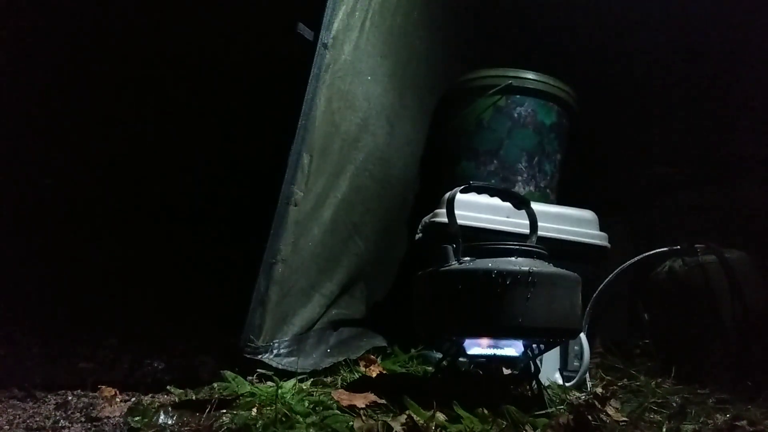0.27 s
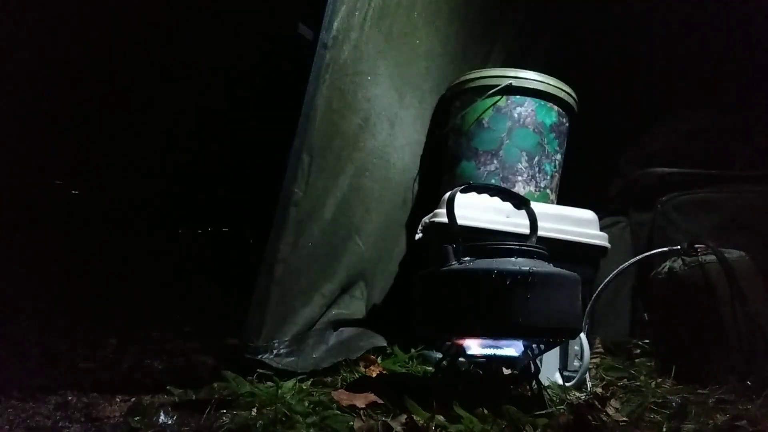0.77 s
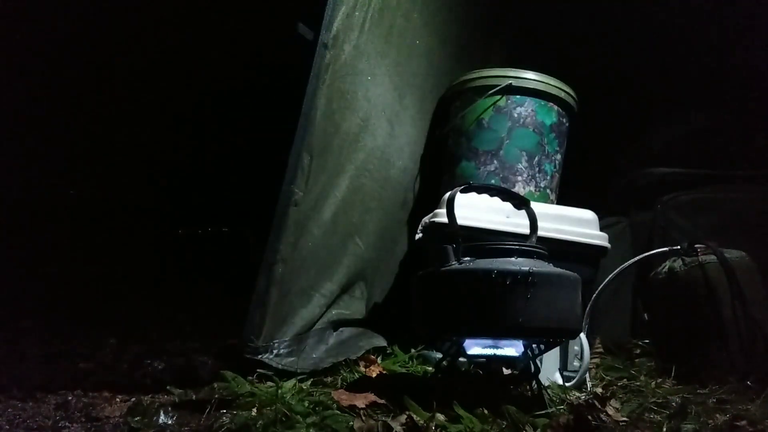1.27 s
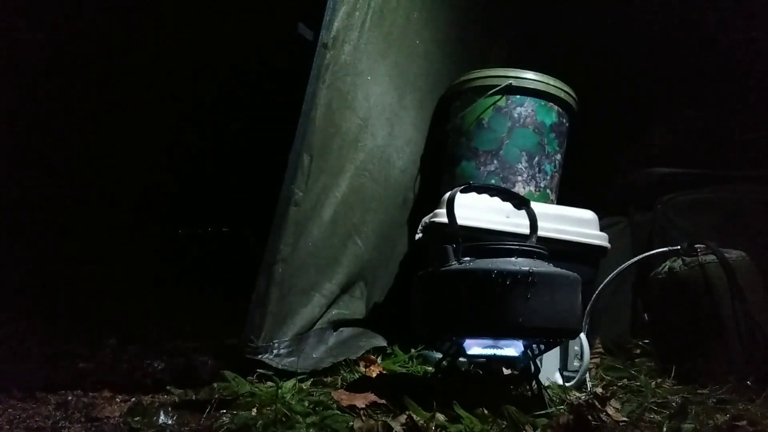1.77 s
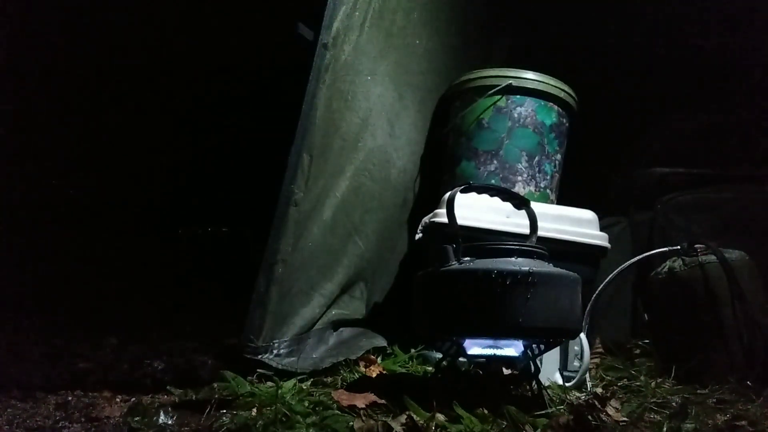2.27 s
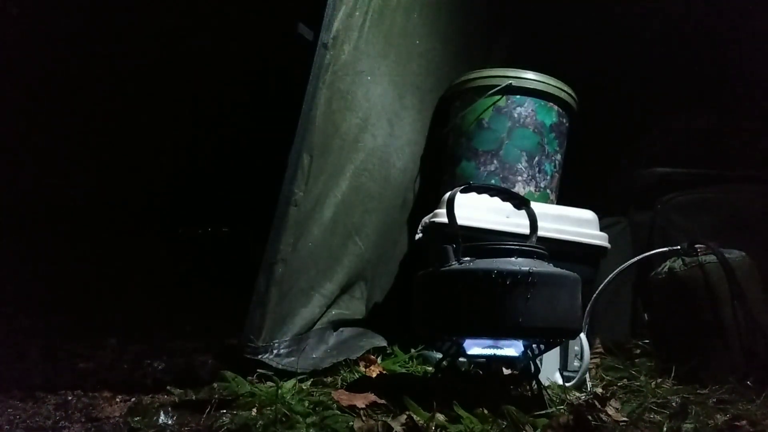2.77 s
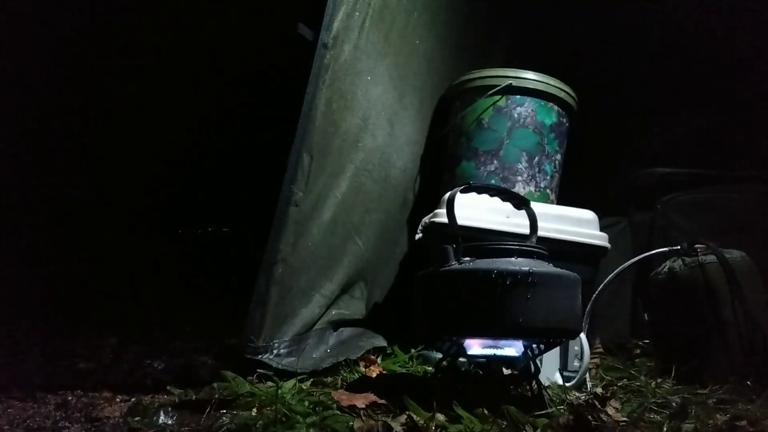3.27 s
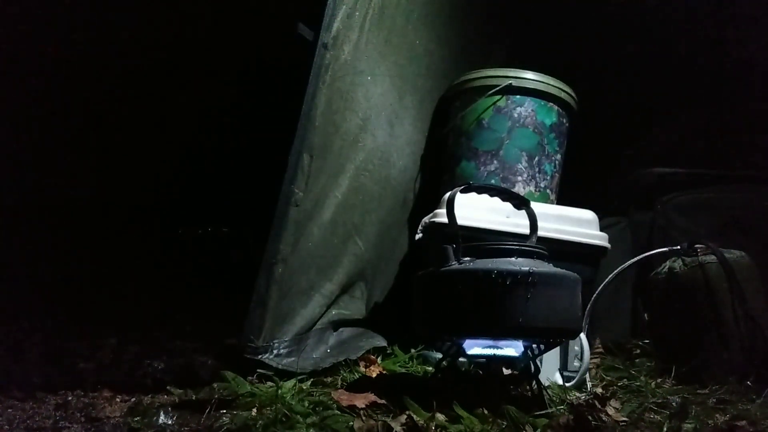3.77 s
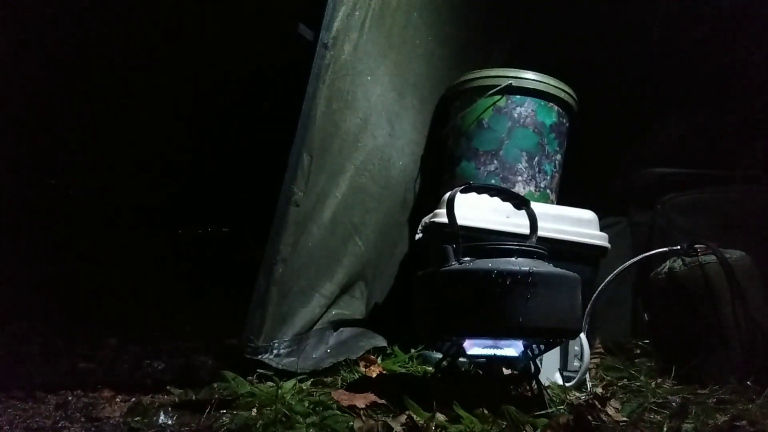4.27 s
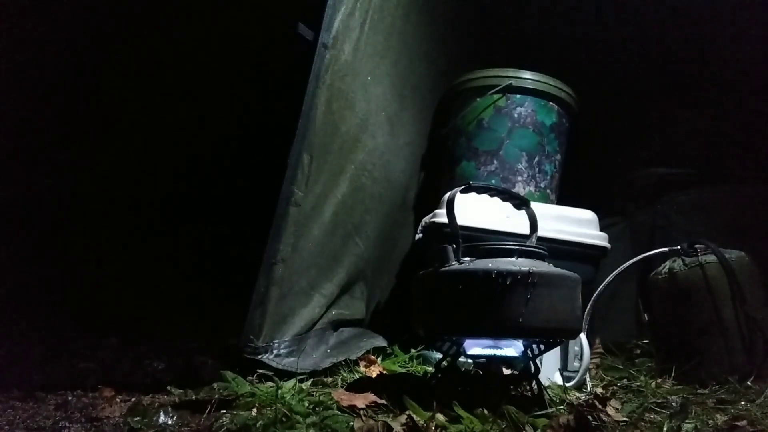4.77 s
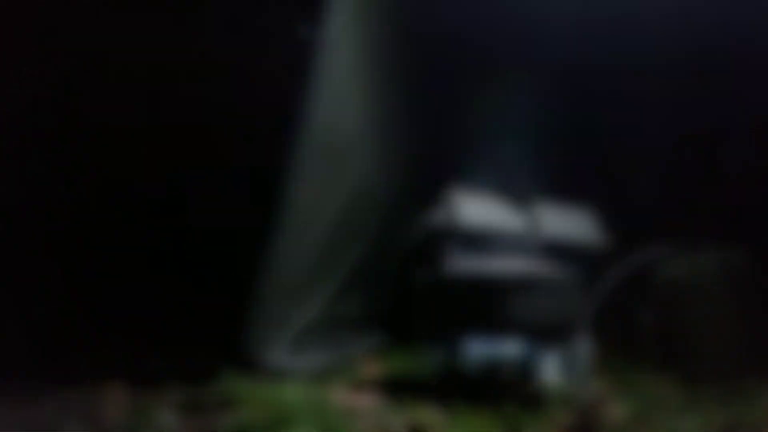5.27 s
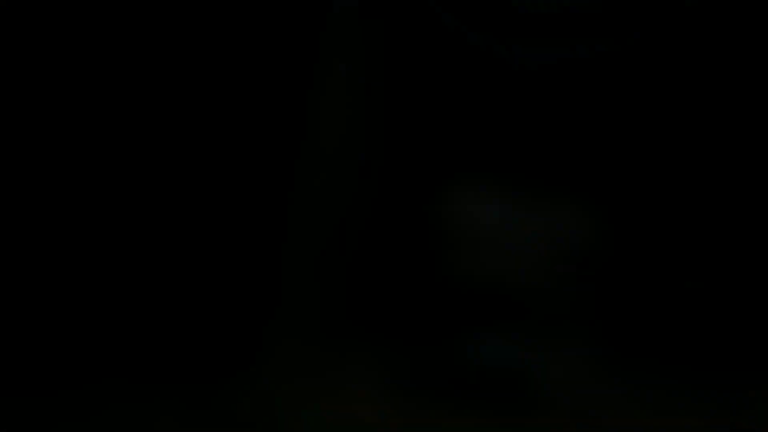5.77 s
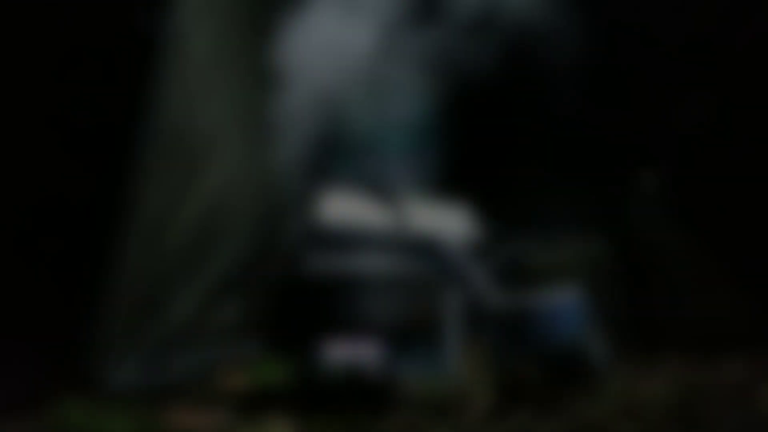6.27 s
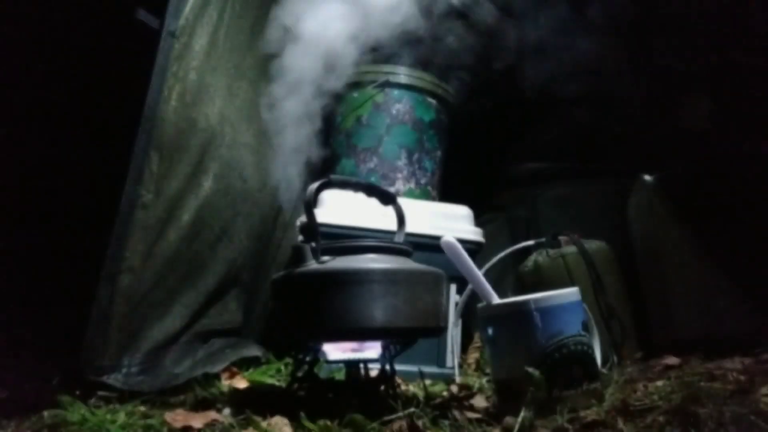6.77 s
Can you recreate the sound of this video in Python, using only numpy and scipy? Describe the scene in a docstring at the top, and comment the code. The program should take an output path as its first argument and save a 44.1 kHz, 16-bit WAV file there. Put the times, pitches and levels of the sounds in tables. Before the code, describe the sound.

Close, outdoors at night: a gas stove gives a low, fluttering roar with a thin jet hiss and faintly singing kettle water. Heavy drops thud on a taut tarp and lighter ones tick and spatter. One drop cracks and sizzles on the burner. A faint high electronic whine creeps in, then an abrupt cut leaves lumpy boiling rumble.

```python
"""A gas camping stove roars under a kettle on a wet night, beside a tarp shelter.
Flame and boil are coloured noise and clicks; the jet hiss, singing water and kettle wall are driven resonances.
Heavy drops thud as ringing cloth modes, light ones tick, ping and spatter, and one drop spits on the burner.
A thin electronic whine sets in as uneven ticks; near the end the scene cuts to the kettle at the boil:
singing, jet hiss and light drops are gone, the water rumbles over the flame and the whine is steady tones."""
import sys
import numpy as np
from scipy import signal
from scipy.fft import rfft, irfft, next_fast_len
from scipy.io import wavfile

SR = 44100
rng = np.random.default_rng(int(sys.argv[2]) if len(sys.argv) > 2 else 0)


def unload_audio(sound):
    """Save the sound as a 16-bit wav file, at the path given as the first command line argument."""
    columns = np.transpose(np.atleast_2d(sound))
    # keep every value between -1 and 1, then stretch to whole-number steps
    steps = np.round(np.clip(columns, -1, 1) * 32767)
    wavfile.write(sys.argv[1], SR, steps.astype(np.int16))


N = 310023
TIME = np.arange(N) / SR
FFT_SIZE = next_fast_len(N + 4096)
BINS_HZ = np.fft.rfftfreq(FFT_SIZE, 1 / SR)
CUT_S = 5.922  # cut from the simmering scene to the boiling one

# Colour of the flame's roar. Each row: frequency in Hz, relative level in dB per Hz.
FLAME_COLOUR = [(32, -64.5), (55, -38), (67, -25), (84, -16), (146, -7.5), (183, -7.5), (259, -1.5),
                (390, -2), (439, 1.5), (522, -1.5), (565, -8.5), (756, -6.5), (851, -15), (934, -11),
                (1300, -34.5), (1690, -62), (2860, -120)]
# Colour of flame plus boiling water. Each row: frequency in Hz, relative level in dB per Hz.
BOIL_COLOUR = [(32, -78), (55, -48), (74, -21), (156, -10), (257, -2), (313, -10), (376, -2), (417, -6),
               (521, -5.5), (563, -16.5), (676, -10), (890, -11.5), (988, -16.5), (1170, -42),
               (1250, -44.5), (1620, -60), (2750, -120)]
# How alike the roar is at the two ears. Each row: frequency in Hz, likeness from -1 to 1.
ROAR_LIKENESS = [(45, -1), (90, 0), (150, 0.6), (250, 1), (400, 0.99), (1200, 0.9)]
# Stereo lean of the flame. Each row: frequency in Hz, left over right in dB.
FLAME_PAN = [(60, 2.8), (150, 6.5), (450, 6.25), (750, 5.2), (1200, 0.92)]
# Stereo lean of the boil. Each row: frequency in Hz, left over right in dB.
BOIL_PAN = [(60, 1.0), (150, 3.9), (300, 1.0), (500, 3.4), (1200, 1.9)]
# Slow swing of the roar, heard in part and about its mean. Each row: time in seconds, level in dB.
ROAR_SWING = [(0.0, -33.5), (0.27, -35), (0.62, -32), (1.04, -37.5), (1.19, -33), (1.49, -32.5),
              (1.74, -33.5), (3.56, -34.5), (3.99, -33.5), (4.36, -35), (5.07, -32.5), (5.56, -32.5),
              (5.85, -33.5), (7.03, -37)]
# The roar's flickering top. Each row: frequency in Hz, share that flickers (0 to 1).
ROAR_FRINGE = [(950, 0.094), (1120, 0.99)]
# Roar and kettle dull briefly. Each row: start in seconds, length in seconds, change in dB.
DULL_SPELLS = [(1.67, 0.05, -6), (2.66, 0.12, -2), (3.38, 0.059, -6), (5.40, 0.17, -13.5)]
# The flame's low boom. Each row: frequency in Hz, width in Hz, relative level in dB rms.
BOOM_MODE = [(147.5, 18, -1)]
# The boom swells. Each row: start in seconds, length in seconds, rise in dB.
BOOM_SWELLS = [(3.66, 0.52, 14.8), (5.19, 0.21, 13)]
FLAME_DB, BOIL_DB = -31.5, -31.5  # rms, before the shaping in burner()
ROAR_FOLLOWS = 0.68  # share of the slow swing that is heard
EDGE_DB = -2  # bright upper edge: 1.5 times this before the cut, half of it after
EDGE_FLUTTER_DB, BASS_WOBBLE_DB, FRINGE_FLICKER_DB = 2, 2.5, 1.5
DULL_RAMP_S, BOOM_RAMP_S = 0.043, 0.08
BOOM_DB = -55.5  # gain between the swells

# Resonances of the gas jet. Each row: frequency in Hz, width in Hz, level in dB rms.
JET_MODES = [(4050, 170, -70.5), (4413, 150, -64.5), (4490, 80, -67.5)]

# Modes of the kettle's wall. Each row: frequency in Hz, width in Hz, level in dB rms before it wavers.
KETTLE_MODES = [(1508, 78, -76.5), (1880, 280, -74), (2730, 510, -82), (3700, 140, -78), (5520, 210, -87)]
WALL_FOLLOWS = 0.39  # share of the simmer's swing that the wall follows

# Colour of the simmer. Each row: frequency in Hz, relative level in dB per Hz.
SIMMER_COLOUR = [(1200, 7), (1700, 7), (2200, -2.5), (2800, 5.5), (3800, 9.5), (5000, -8), (5600, -11.5),
                 (7000, -15.5), (8500, -5)]
# Single swarms merge into an even rush as the water heats. Each row: time in seconds, swell depth in dB.
SWELL_DEPTH = [(2.0, 14), (5.2, 7)]
# The simmer comes in surges. Each row: start in seconds, length in seconds, rise in dB.
SURGES = [(1.28, 0.36, 6.5), (2.1, 0.14, 3.5), (3.92, 0.43, 5), (5.22, 0.32, 8.5), (5.66, 0.3, 8)]
SIMMER_DB, HEATING_DB_PER_S, SURGE_RAMP_S = -71, 0.13, 0.071

# Background hiss of the microphones. Each row: frequency in Hz, relative level in dB per Hz.
HISS_COLOUR = [(100, 13.5), (1300, 7.5), (2000, 8.5), (3200, 4.5), (5300, 2.5), (6500, 2), (10000, -0.5),
               (15000, -4)]

# Bubble swarms that sing out. Each row: centre in seconds, length in seconds, pitch in Hz, peak in dB rms.
LOUD_SWARMS = [(0.287, 0.049, 3550, -63), (1.234, 0.031, 2960, -60), (1.962, 0.029, 3030, -59),
               (2.253, 0.045, 1640, -63), (4.325, 0.19, 1520, -61), (4.95, 0.38, 1430, -65.5),
               (5.85, 0.064, 3120, -60)]
# A large bubble thumps at the boil. Each row: time in seconds, level of the push in dB.
BOIL_THUMP = [(6.476, -15.5)]
SWARM_WIDTH = 0.18  # share of the pitch

# Heavy drops on the tarp. Each row: time in seconds, thud in dB, tautness of the spot as tilt in dB per octave,
# slap in dB, spray in dB, seconds until the cloth snaps back, that second thud against the first in dB.
HEAVY_DROPS = [(0.5014, -3, 6, -34, -52, 0.0058, -11), (0.9377, 1.5, 1.5, -35.5, -50.5, 0.015, -11),
               (1.4943, -1, -3.5, -35, -58, 0.009, -9), (2.0225, -4.5, 2, -37, -53, 0.0045, -18),
               (2.4885, -11.5, -8, -48.5, -59, 0.00413, -6), (3.5655, -9, 0, -39, -62, 0.0076, -5),
               (3.814, -5.5, -11, -36.5, -54, 0.00566, -0.5)]
# Modes of the taut cloth. Each row: frequency in Hz, relative level in dB, 60 dB decay in seconds.
TARP_MODES = [(231, -33, 0.07), (363, -20.5, 0.057), (465, -14.5, 0.051), (567, -16, 0.024),
              (727, -17.5, 0.021), (860, -24, 0.012), (1520, -30, 0.0074), (1750, -33, 0.0038)]
# Colour of a drop's slap. Each row: frequency in Hz, relative level in dB per Hz.
SLAP_COLOUR = [(400, 0), (900, 9), (1650, 7.5), (2300, 10.5), (3000, 4), (4200, -2.5), (5200, -19),
               (9000, -36.5)]
# Colour of a drop's spray. Each row: frequency in Hz, relative level in dB per Hz.
SPRAY_COLOUR = [(2500, -18), (4400, 1), (5500, 6), (6800, -5.5), (8200, -5.5), (9500, -11), (12000, -16),
                (15000, -19)]
REBOUND_SPLASH_DB = -13  # the snap back splashes less than the drop

# Light drops on wet things nearby. Each row: time in seconds, slap in dB, spray in dB,
# pitch of the ping in Hz, ping in dB.
LIGHT_DROPS = [(0.7418, -38, -54.5, 3460, -47), (1.4098, -36, -71, 3000, -53),
               (1.4285, -35, -69, 3120, -55.5), (1.4642, -35.5, -61, 3000, -56.5),
               (1.804, -50, -50.5, 7700, -56), (2.465, -53.5, -52.5, 5700, -61),
               (2.491, -57, -64, 9800, -58.5), (2.574, -65, -70, 10100, -65), (2.9243, -59, -51, 5600, -59),
               (5.2251, -42.5, -61, 1500, -47), (5.831, -43, -51.5, 3600, -48.5)]
PING_WIDTH, PING_T60_S = 0.51, 0.061  # share of the pitch; seconds
DRIPS_PER_S, DRIP_SLAP_DB, DRIP_SPRAY_DB = 1.4, -66.5, -64

# Whine stuttering before the cut. Each row: frequency in Hz, width in Hz, level in dB rms.
STUTTER_TONES = [(13900, 840, -76), (14940, 210, -79), (15250, 400, -87)]
# Whine steady after the cut. Each row: frequency in Hz, width in Hz, level in dB rms.
STEADY_TONES = [(14500, 15, -90), (14622, 15, -79.5), (15125, 15, -85), (15255, 15, -75), (15375, 15, -78)]
WHINE_START_S, TICKS_PER_S = 3.63, 500
OFFBEAT_DB, TICK_SPREAD_DB, WHINE_FLUTTER_DB = -5, 3, 0.5

# A drop spits on the hot burner. Each row: time in seconds, level in dB.
SPIT = [(3.8936, -34)]
# Modes of the burner head. Each row: frequency in Hz, relative level in dB, 60 dB decay in seconds.
BURNER_MODES = [(2020, -6, 0.011), (2810, 9.5, 0.02), (3580, 1, 0.0084), (5430, 8, 0.02), (8150, -1, 0.011),
                (11900, -10, 0.0085)]
# Colour of the sizzle after the spit. Each row: frequency in Hz, relative level in dB per Hz.
SIZZLE_COLOUR = [(2000, -12), (3200, 4), (5600, -3), (6800, 0), (8400, 2.5), (9500, -20), (12300, -8),
                 (14000, -23)]
SIZZLE_DB, SIZZLE_T60_S = -17, 0.35  # level against the hit

# Phase between the two microphone ports. Each row: frequency in Hz, radians by which left leads.
PORT_PHASE = [(0, 0.5), (200, 0.16), (1550, 0), (1950, -2.5), (2300, -0.5), (2600, 1.5), (3250, 0.5),
              (4400, 3), (5500, 6), (15500, 34.5)]
# Narrow dip near 2.3 kHz in the part common to both ears. Each row: frequency in Hz, gain of that part in dB.
COMMON_DIP = [(1950, 0), (2200, -23), (2400, -15.5), (2650, 0)]
CUTOFF_HZ = 15550


def from_db(db):
    """Decibels to gain."""
    return 10 ** (np.asarray(db) / 20)


def rms_one(x):
    """Scale to unit rms."""
    return x / np.sqrt(np.mean(x ** 2) + 1e-20)


def noise_pair():
    """Two unrelated white noises."""
    return rng.standard_normal((2, N))


def lean(left_db, right_db):
    """Left and right gains."""
    return from_db([[left_db], [right_db]])


def over_hz(points):
    """A (Hz, value) table at every frequency bin, joined on a log axis."""
    hz, value = np.transpose(points)
    return np.interp(np.log(BINS_HZ + 1), np.log(hz + 1), value)


def over_time(points):
    """A (seconds, value) table at every sample."""
    return np.interp(TIME, *np.transpose(points))


def filtered(x, response):
    """Pass x through a frequency response."""
    return irfft(rfft(x, FFT_SIZE) * response, FFT_SIZE)[..., :N]


def butter(x, order, hz, kind="low"):
    """Pass x through a Butterworth filter."""
    return signal.sosfilt(signal.butter(order, hz, kind, fs=SR, output="sos"), x)


def causal(spectrum):
    """Minimum-phase response of unit power with this colour: nothing sounds before its cause."""
    cepstrum = irfft(np.log(rms_one(from_db(over_hz(spectrum)))), FFT_SIZE)
    cepstrum[1:FFT_SIZE // 2] *= 2
    cepstrum[FFT_SIZE // 2 + 1:] = 0
    return np.exp(rfft(cepstrum))


def drift(rate):
    """Slow random wander with a spread of 1, made at every 40th sample and joined by lines."""
    r = np.exp(-80 * np.pi * rate / SR)
    noise = rng.standard_normal(N // 40 + 2002)
    slow = signal.lfilter([1], [1, -2 * r, r * r], noise)[2000:]  # drop the filter's run-up
    return np.interp(np.arange(N) / 40, np.arange(len(slow)), rms_one(slow))


def spells(rows, ramp_s):
    """Each (start, length, dB) row comes in, holds and goes again; dB at every sample."""
    total_db = 0
    for start, length, level_db in rows:
        inside_s = np.minimum(TIME - start, start + length - TIME)
        total_db = total_db + level_db * np.clip(.5 + inside_s / ramp_s, 0, 1)
    return total_db


def clicks(times, levels_db):
    """One click of the given height at each time."""
    out = np.zeros(N)
    out[np.round(times * SR).astype(int)] = from_db(levels_db)
    return out


def fade(hits, t60):
    """An envelope that jumps at each hit and dies away; overlapping hits add in power."""
    return np.sqrt(signal.lfilter([1], [1, -from_db(-120 / (t60 * SR))], hits ** 2 + 1e-18))


def ring(x, hz, t60):
    """A unit click sets a decaying sine of starting height 1 ringing."""
    r, w = from_db(-60 / (t60 * SR)), 2 * np.pi * hz / SR
    return signal.lfilter([0, np.sin(w)], [1, -2 * r * np.cos(w), r * r], x + 1e-18)


def resonances(x, modes):
    """Drive steep-sided (Hz, width, dB rms) resonances in parallel."""
    out = 0
    for hz, width, level_db in modes:
        r = np.exp(-np.pi * width / SR)
        peak = [1, 0, -1, 1, -2 * r * np.cos(2 * np.pi * hz / SR), r * r]
        out = out + from_db(level_db) * rms_one(signal.sosfilt([peak, peak], x + 1e-18))
    return out


def two_ears(pair, alike):
    """Mix two unrelated signals into left and right with a given likeness."""
    alike = np.clip(alike, -1, 1)
    shared = np.sqrt((1 + alike) / 2) * pair[0]
    opposed = np.sqrt((1 - alike) / 2) * pair[1]
    return shared + opposed * np.array([[1], [-1]])


def grains(per_s, spread_db):
    """Two trains of random clicks of uneven size and either sign, rms 1."""
    sizes = from_db(spread_db * np.minimum(rng.exponential(1, (2, N)), 4))
    signed = sizes * rng.choice([-1, 1], (2, N))
    return rms_one(signed * (rng.random((2, N)) < per_s / SR))


def splash(hits, colour, tick_db, crack_t60, tail_t60, tail_db):
    """Each hit ticks and cracks briefly, then its scattered droplets patter down in clumps."""
    tick = -from_db(tick_db) * hits
    crack = fade(hits, crack_t60) * two_ears(noise_pair(), alike=0.2)
    droplets = two_ears(grains(per_s=5000, spread_db=2.5), alike=0.8) * from_db(1.3 * drift(45))
    patter = from_db(tail_db) * fade(hits, tail_t60) * droplets
    return filtered(tick + crack + patter, causal(colour))


def rumble(pulses, spectrum, pan, flutter_db):
    """Pressure pulses coloured by the gap under the kettle; their strength flutters."""
    fluttering = pulses * from_db(flutter_db * drift(45.0))
    ears = two_ears(rfft(fluttering, FFT_SIZE), over_hz(ROAR_LIKENESS))
    ears = ears * causal(spectrum) * from_db(over_hz(pan) * np.array([[.5], [-.5]]))
    return rms_one(irfft(ears, FFT_SIZE)[:, :N])


def vary_band(x, shares, gain_db):
    """Change the level of the part of x that the (Hz, share) table picks out."""
    return x + (from_db(gain_db) - 1) * filtered(x, over_hz(shares))


def burner(boiling):
    """Turbulent flame on a steady gas flow; at the boil, collapsing bubbles make the roar lumpier."""
    flame = from_db(FLAME_DB) * rumble(noise_pair(), FLAME_COLOUR, FLAME_PAN, flutter_db=1.5)
    bubbles = grains(per_s=5000, spread_db=2.5)
    boil = from_db(BOIL_DB) * rumble(bubbles, BOIL_COLOUR, BOIL_PAN, flutter_db=1.7)
    swing_db = over_time(ROAR_SWING)
    swing = from_db(ROAR_FOLLOWS * (swing_db - swing_db.mean()))
    roar = swing * (flame * (1 - boiling) + boil * boiling)
    # bass wobble, flutter of the upper part, trim and dulling of the edge, flicker of the top
    roar = vary_band(roar, [(170, 0.76), (280, 0)], BASS_WOBBLE_DB * drift(5.6))
    roar = vary_band(roar, [(540, 0.078), (680, 0.67)], EDGE_FLUTTER_DB * drift(9.4))
    edge_db = EDGE_DB * (1.5 - boiling) + spells(DULL_SPELLS, DULL_RAMP_S)
    roar = vary_band(roar, [(750, 0.32), (950, 1.0)], edge_db)
    roar = vary_band(roar, ROAR_FRINGE, FRINGE_FLICKER_DB * drift(12))
    boom_db = BOOM_DB + spells(BOOM_SWELLS, BOOM_RAMP_S)
    boom = from_db(boom_db) * resonances(two_ears(noise_pair(), alike=1.0), BOOM_MODE)
    return roar + boom * lean(2.0, -4.0)


def gas_jet():
    """The gas jet hisses evenly in a few narrow resonances of the burner tube."""
    return resonances(two_ears(noise_pair(), alike=0.96), JET_MODES) * lean(.5, -.5)


def kettle_wall():
    """Countless bubble collapses keep the wall's modes ringing, each wavering by itself."""
    patter = two_ears(grains(per_s=8700, spread_db=3.0), alike=0.99)
    return sum(resonances(patter, [mode]) * from_db(5.3 * drift(6.8)) for mode in KETTLE_MODES)


def simmer():
    """Swarms of bubbles sing, each at the pitch of its bubble size, and swell and fade on their own."""
    collapses = [two_ears(grains(per_s=3600, spread_db=4.5), alike=0.43) for _ in range(2)]
    depth_db = over_time(SWELL_DEPTH)
    swarms = 0
    for k, hz in enumerate(np.geomspace(1200, 8800, 36)):
        width_hz = 120 * np.sqrt(hz / 3000)
        swell = from_db(depth_db * (np.tanh(drift(12.4)) - 0.87))
        swarms = swarms + resonances(collapses[k % 2], [(hz, width_hz, 0)]) * np.sqrt(hz) * swell
    return rms_one(filtered(swarms, causal(SIMMER_COLOUR)))


def microphone_hiss():
    """Wide, even noise for the microphones' own hiss."""
    return from_db(-66.5) * filtered(two_ears(noise_pair(), alike=.3), causal(HISS_COLOUR))


def big_bubbles():
    """Now and then one swarm sings out; at the boil a large bubble thumps against the base."""
    collapses = two_ears(grains(per_s=4300, spread_db=-0.5), alike=0.8)
    sung = 0
    for centre, length, hz, level_db in LOUD_SWARMS:
        swell = np.exp(-(2 * (TIME - centre) / length) ** 2)
        sung = sung + resonances(collapses, [(hz, SWARM_WIDTH * hz, level_db)]) * swell
    push = clicks(*np.transpose(BOIL_THUMP))
    thump = butter(ring(push, hz=405, t60=0.022), 6, 900)
    return sung + butter(thump, 2, 200, "high")


def heavy_drops():
    """A fat drop pushes the tarp softly and bursts; the cloth snaps back, rings and flaps a moment."""
    times, thud_db, tilt_db, slap_db, spray_db, rebound_s, rebound_db = np.transpose(HEAVY_DROPS)
    # each drop is followed by its snap back
    times = np.r_[times, times + rebound_s]
    thud_db = np.r_[thud_db, thud_db + rebound_db]
    tilt_db = np.r_[tilt_db, tilt_db]
    slap_db = np.r_[slap_db, slap_db + REBOUND_SPLASH_DB]
    spray_db = np.r_[spray_db, spray_db + REBOUND_SPLASH_DB]
    flapping = from_db(-32.0) * rng.standard_normal(N)
    cloth = 0
    for hz, level_db, t60 in TARP_MODES:
        push = clicks(times, thud_db + level_db + tilt_db * np.log2(hz / 500))
        cloth = cloth + ring(fade(push, t60=0.11) * flapping - push, hz, t60)
    thud = butter(butter(cloth, 4, 1500), 2, 210, "high")
    slap = splash(clicks(times, slap_db), SLAP_COLOUR,
                  tick_db=17.5, crack_t60=0.04, tail_t60=0.57, tail_db=-13.5)
    spray = splash(clicks(times, spray_db), SPRAY_COLOUR,
                   tick_db=17.0, crack_t60=0.053, tail_t60=0.33, tail_db=-6.5)
    return thud * lean(1.0, -3.0) + (slap + spray) * lean(1.0, -1.0)


def light_drops():
    """Small drops tick, knock lightly, ping and spatter; fainter drips fall at random without a ping."""
    drip_times = TIME[rng.random(N) < DRIPS_PER_S / SR]
    drips = [(s, DRIP_SLAP_DB, DRIP_SPRAY_DB) for s in drip_times]
    drops = [row[:3] for row in LIGHT_DROPS]
    times, slap_db, spray_db = np.transpose(drops + drips)
    hits = clicks(times, slap_db)
    slap = splash(hits, SLAP_COLOUR, tick_db=17.0, crack_t60=0.008, tail_t60=0.34, tail_db=-13.0)
    knock = from_db(11.0) * butter(ring(-hits, hz=970, t60=0.0069), 2, [600, 1500], "band")
    spray = splash(clicks(times, spray_db), SPRAY_COLOUR,
                   tick_db=3.0, crack_t60=0.045, tail_t60=0.29, tail_db=-7.0)
    fizz = two_ears(noise_pair(), alike=0.68)
    pings = 0
    for s, _, _, hz, ping_db in LIGHT_DROPS:
        pings = pings + resonances(fizz, [(hz, PING_WIDTH * hz, ping_db)]) * fade(clicks(s, 0), PING_T60_S)
    return (slap + knock + spray + pings) * lean(.7, -.7)


def whine(boiling):
    """Electronic whine: uneven ticks, every fourth one strong; after the cut, thin steady tones."""
    beats = np.arange(WHINE_START_S, CUT_S, 1 / TICKS_PER_S)
    offbeat = np.arange(len(beats)) % 4 > 0
    late_s = offbeat * rng.uniform(0, .001, len(beats))
    tick_db = OFFBEAT_DB * offbeat + TICK_SPREAD_DB * rng.standard_normal(len(beats))
    ticks = clicks(beats + late_s, tick_db) * from_db(WHINE_FLUTTER_DB * drift(25))
    steady = boiling * resonances(rng.standard_normal(N), STEADY_TONES)
    return (resonances(ticks, STUTTER_TONES) + steady) * lean(1.0, -1.0)


def spit():
    """Water meets hot metal: a sharp crack rings the burner head, then the drop sizzles away."""
    hit = clicks(*np.transpose(SPIT))
    metal = 0
    for k, (hz, level_db, t60) in enumerate(BURNER_MODES):
        metal = metal + (-1) ** k * from_db(level_db) * ring(hit, hz, t60)  # alternating sign
    crack = splash(hit, SLAP_COLOUR, tick_db=11.5, crack_t60=0.059, tail_t60=0.8, tail_db=-17.5)
    burst = splash(hit, SPRAY_COLOUR, tick_db=16.0, crack_t60=0.031, tail_t60=0.47, tail_db=-14.5)
    steam = filtered(two_ears(noise_pair(), alike=0.46), causal(SIZZLE_COLOUR))
    sizzle = from_db(SIZZLE_DB) * fade(hit, SIZZLE_T60_S) * steam
    return from_db(-8.0) * metal + from_db(0.5) * crack + from_db(-6.5) * burst + sizzle


def scene():
    """Stove, kettle and drops, then a cut to the boil; the kettle sings only in the simmering scene."""
    boiling = np.clip((TIME - CUT_S) / .004, 0, 1)
    vigour_db = HEATING_DB_PER_S * TIME + spells(SURGES, SURGE_RAMP_S)
    wall_db = WALL_FOLLOWS * (vigour_db - vigour_db.mean()) + spells(DULL_SPELLS, DULL_RAMP_S)
    wall = from_db(wall_db) * kettle_wall()
    singing = from_db(SIMMER_DB + vigour_db) * simmer()
    simmering_only = gas_jet() + wall + singing + light_drops() + spit()
    others = burner(boiling) + microphone_hiss() + big_bubbles() + heavy_drops() + whine(boiling)
    return others + simmering_only * (1 - boiling)


def record(dry):
    """The two ports hear the treble out of step; the top is cut steeply and the common part dips."""
    lead = np.interp(BINS_HZ, *np.transpose(PORT_PHASE))
    low_pass = 1 / np.sqrt(1 + (BINS_HZ / CUTOFF_HZ) ** 400)
    ears = filtered(dry, low_pass * np.exp(1j * lead * np.array([[.5], [-.5]])))
    return ears + filtered(ears.mean(axis=0), from_db(over_hz(COMMON_DIP)) - 1)


dry = scene()
out = record(dry)
unload_audio(out)
```